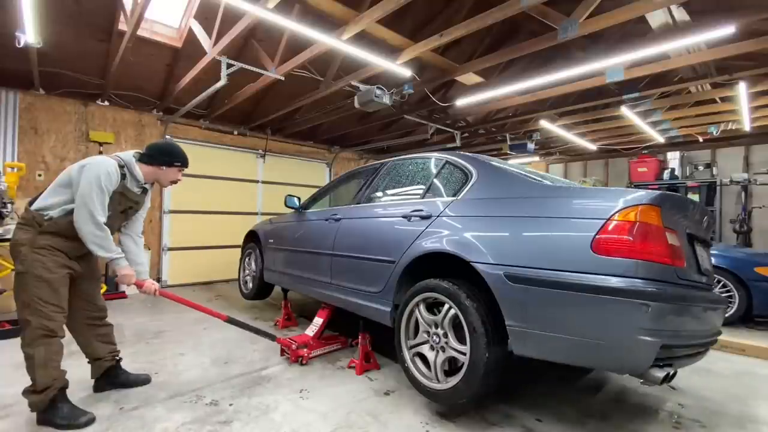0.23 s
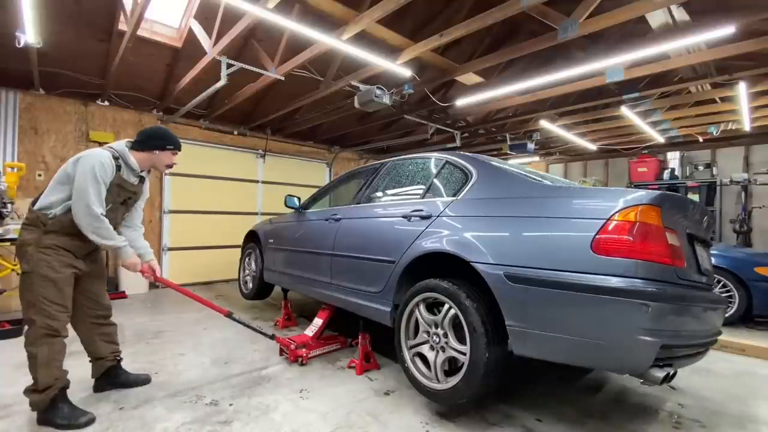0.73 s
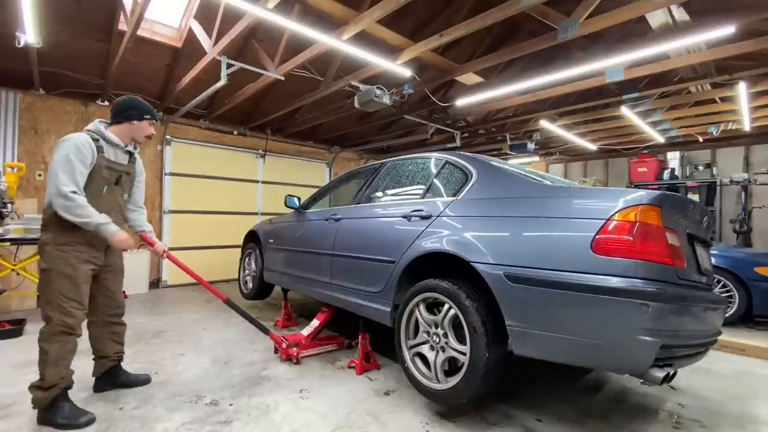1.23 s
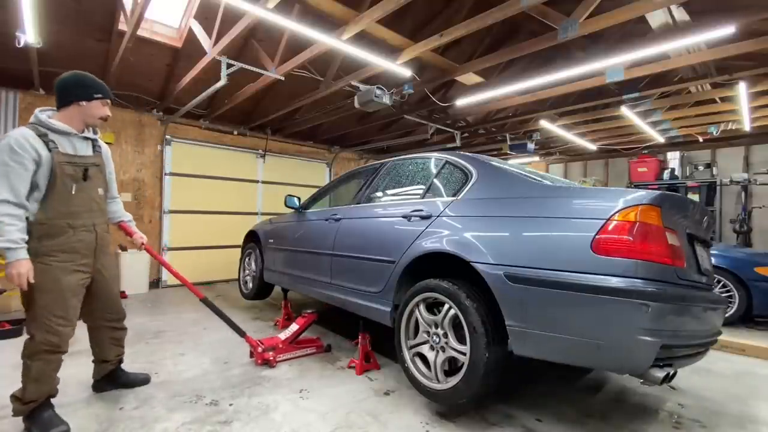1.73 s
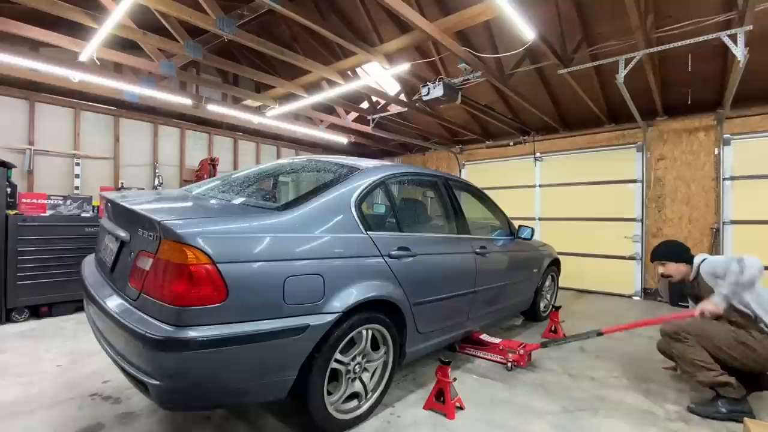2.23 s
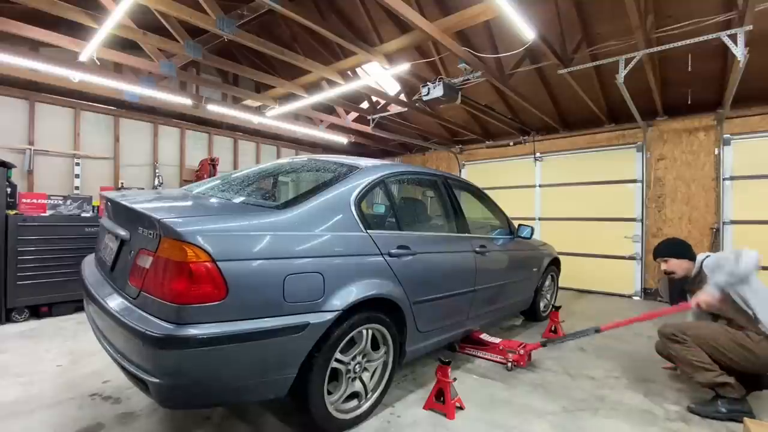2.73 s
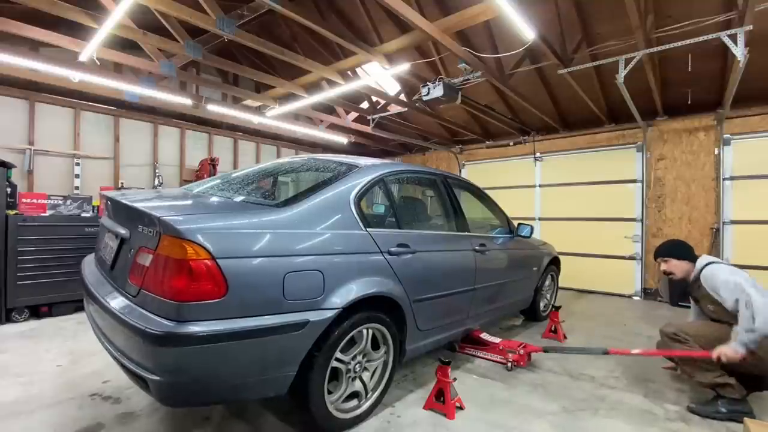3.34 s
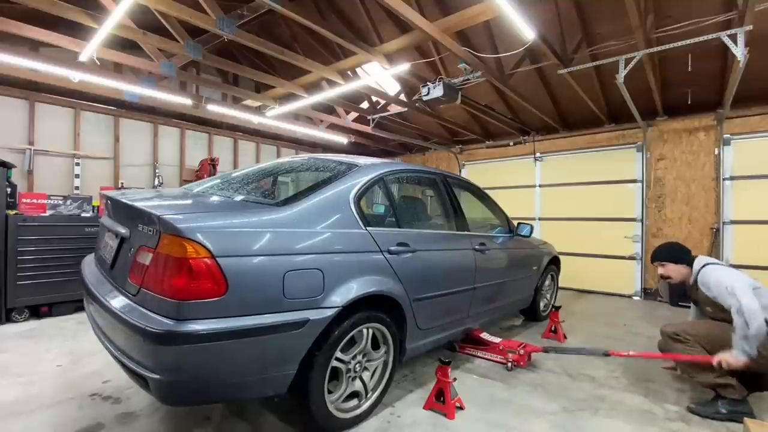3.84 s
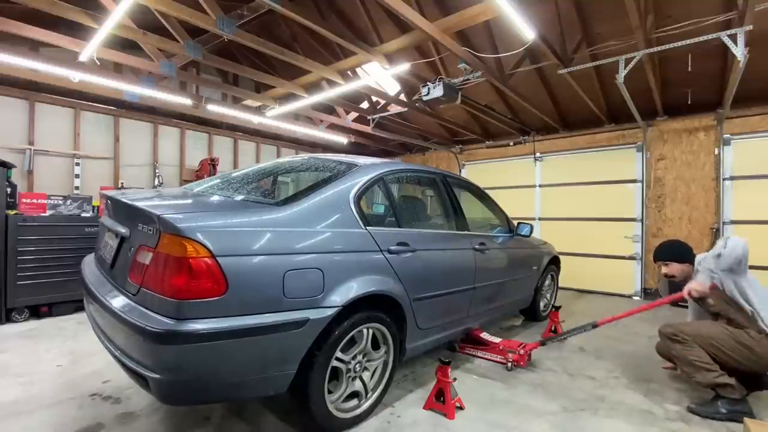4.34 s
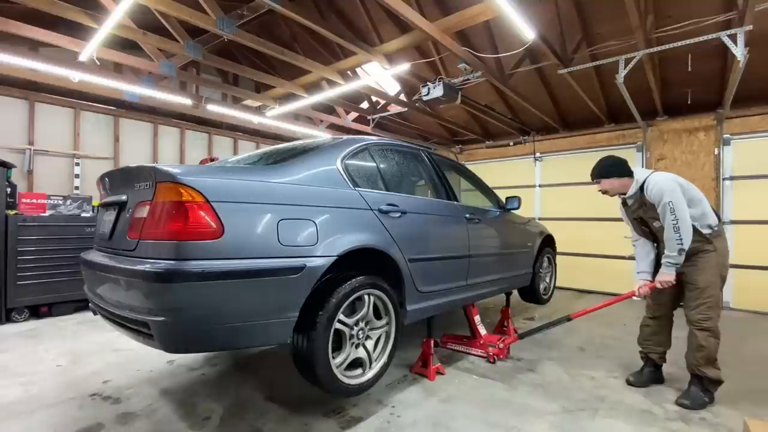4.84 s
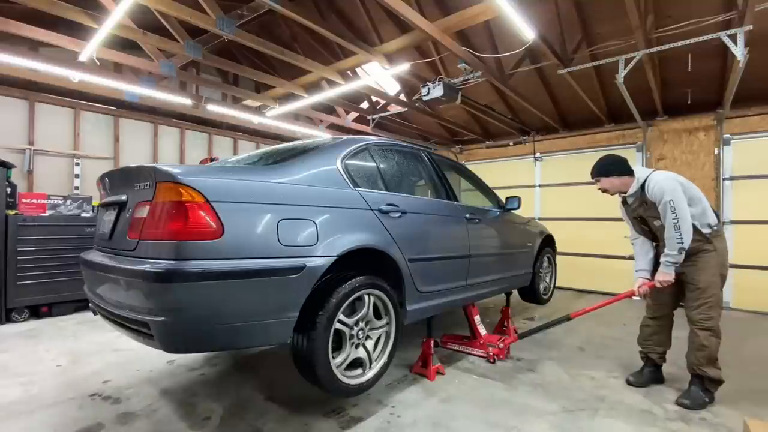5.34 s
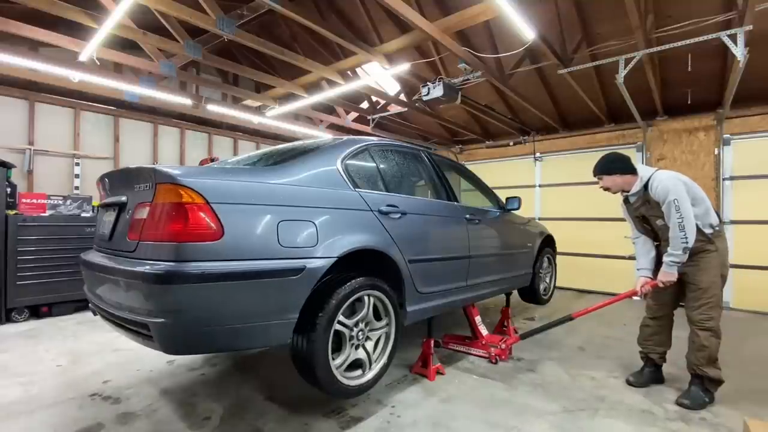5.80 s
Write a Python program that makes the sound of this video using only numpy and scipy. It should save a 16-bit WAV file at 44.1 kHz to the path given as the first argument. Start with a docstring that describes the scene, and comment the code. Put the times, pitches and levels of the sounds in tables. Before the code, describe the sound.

A floor jack rolls over concrete with a thin squeal, is pumped with metallic clacks, then a car lands on a stand with a loud clank.

```python
"""First comes a faint rustle of clothes and boots over a low hum, in a timber garage.
The steel handle of a hydraulic floor jack pings, then the jack rolls over concrete, its dry axles
squealing thinly. The handle is pumped: it clacks against its socket going up, and the piston knocks
more softly going down. After a pause the car lands on a steel stand with one loud clank
that rings through the room."""
import sys
import numpy as np
from scipy import signal
from scipy.fft import rfft, irfft, next_fast_len
from scipy.io import wavfile
from scipy.ndimage import uniform_filter1d, map_coordinates

SR = 44100
rng = np.random.default_rng(int(sys.argv[2]) if len(sys.argv) > 2 else 0)


def to_wav(sig):
    """Store sig (one row per channel, or 1-D mono) as 16-bit WAV at the path in sys.argv[1].

    Samples outside -1..1 are clipped; the rate is SR.
    """
    pcm = np.clip(np.atleast_2d(sig), -1, 1) * 32767
    pcm = np.round(pcm).astype(np.int16)
    wavfile.write(sys.argv[1], SR, pcm.T)  # frames by channels


N = 267461

# A fade time (t60) is how long a sound takes to drop by 60 dB. # A colour lists how strong a noise is from low
# to high; a ring lists the notes of a struck object. # background levels, each holding from its start until the
# next row: (start [s], shuffle level [dB], cloth level [dB], hiss level [dB], hum change [dB])
BACKGROUND_STEPS = [(0, -65, -69.5, -74.5, -0.5), (1.0, -65.5, -68.5, -70, 0.5), (2.25, -68, -73.5, -72.5, -7),
                    (4.76, -72.5, -74, -78.5, -11), (5.3, -70, -73.5, -73, -7.5)]
# leaning on the handle, then lifting it again: (time [s], push level [dB], slide level [dB])
PUSHES = [(2.56, -59.5, -69), (3.27, -58.5, -75.5), (4.03, -57.5, -71.5)]
# colours of shuffling boots, rustling cloth and its hiss: (frequency [Hz], level [dB])
SHUFFLE_COLOUR = [(13, -43), (22, 1.5), (49, 0.5), (134, -2.5), (172, -1), (236, -4), (273, -1),
                  (547, -6.5), (588, -15.5), (700, -7), (910, -44), (1540, -120)]
CLOTH_COLOUR = [(250, -29), (550, 6), (1300, -1), (2500, -9), (4000, -40.5)]
HISS_COLOUR = [(1500, -7.5), (3000, 2.5), (4500, -1.5), (6800, 0.5), (8800, -11.5), (15000, -16.5)]
# tones of the garage's hum: (pitch [Hz], level [dB])
HUM_TONES = [(63, -74.5), (102.3, -71), (166.9, -73), (291, -76.5), (334, -77.5), (398, -77)]
# the loaded jack's faint tone: (time [s], length [s], level [dB])
GROANS = [(0, 0.3, -66), (.48, 0.11, -68)]
# squeaks and scrapes of loaded steel: (time [s], level [dB], pitch [Hz], width [Hz], fade time [s])
SQUEAKS = [(0.0, -64, 6750, 250, 0.18), (1.03, -78, 5900, 130, .9), (1.235, -59, 5550, 220, 0.14),
           (2.944, -43.5, 1150, 1000, 0.085), (3.688, -41.5, 1240, 700, 0.072),
           (4.407, -45, 1250, 800, 0.089), (4.96, -64, 1700, 700, .14), (5.02, -63, 2580, 550, 0.42)]
# grit snapping underfoot: (time [s], level [dB])
GRIT_SNAPS = [(0.323, -56), (2.607, -56.5), (2.7764, -51), (3.2311, -47), (3.523, -52)]
# colour of a sharp snap, of grit or of steel: (frequency [Hz], level [dB])
SNAP_COLOUR = [(1200, -8), (3000, 4.5), (4500, 0.5), (7000, -5), (10000, -23), (15000, -17)]
# thuds of the loose handle and of boots: (time [s], level [dB], pitch [Hz])
THUDS = [(.52, -53, 130), (2.645, -53.5, 260), (2.78, -54, 110), (2.958, -44, 302), (3.169, -50.5, 294),
         (3.235, -52.5, 130), (3.713, -50, 293), (3.975, -59, 119), (4.425, -46.5, 308), (4.69, -59, 300),
         (4.767, -60, 110), (5.461, -55.5, 149), (5.558, -50.5, 294), (5.595, -49.5, 140)]

# the handle shifting in its socket: (time [s], level [dB])
PINGS = [(0.6887, -43)]
# colour of the tick that starts a ping: (frequency [Hz], level [dB])
TICK_COLOUR = [(150, -22), (520, 5), (800, 1), (1900, 5), (2500, -2), (4400, -4.5), (5500, -15),
               (9000, -28), (15000, -47)]
# ring of the handle's tube: (pitch [Hz], level [dB], fade time [s])
TUBE_RING = [(520, -7.5, .45), (1100, -25, .4), (1830, -4, 0.28), (2940, -24, .26), (3140, 1, 0.32),
             (3330, -12, .35), (4430, -18, .3), (6340, -6, 0.17)]
# how long the garage echoes: (frequency [Hz], fade time [s])
ECHO_TIMES = [(60, 0.56), (150, 0.54), (500, 0.56), (1000, 0.65), (2700, 0.63), (5400, 0.63), (7700, 0.45),
              (11000, 0.32), (15000, 0.19)]

# colour of steel wheels on concrete: (frequency [Hz], level [dB])
WHEEL_COLOUR = [(35, -39), (70, -15), (200, -3.5), (480, 0.5), (1320, 2), (1500, -4.5), (1900, -9.5),
                (2500, -10), (4600, -21), (5600, -21.5), (6350, -12.5), (9500, -40.5), (13500, -39),
                (15500, -34)]
# pitches that the jack's frame makes louder: (pitch [Hz], width [Hz], boost [dB])
FRAME_BOOSTS = [(244, 8.4, 12.5), (393, 14, 7.5), (491, 38, 6.5), (620, 14, 5), (762, 14, 5.5),
                (860, 28, 5), (1858, 62, 10.5), (2300, 27, 3), (3160, 70, 7), (3300, 110, 5.5),
                (4060, 64, 7), (4330, 38, 10), (5060, 57, 7)]
# low and high axle squeal: (pitch [Hz], width [Hz], level at full speed [dB], power of speed [no unit])
SQUEAL_TONES = [(6200, 170, -64.5, 1.25), (13050, 100, -73, 1.7)]
# a dry axle catching, so that the squeal flares: (time [s], half length [s], boost [dB])
AXLE_CATCHES = [(1.53, .04, 12), (1.685, 0.039, 15.5), (1.98, 0.031, 17.5), (2.23, .02, 5)]
# colour of the thin hiss around the squeal: (frequency [Hz], level [dB])
THIN_HISS_COLOUR = [(9000, -30), (12000, -9), (13500, 0), (15500, -3)]
# wheels hitting pits in the floor: (time [s], level [dB], pitch [Hz])
JOLTS = [(1.424, -38, 1550), (1.444, -44, 1790), (1.742, -43.5, 1990), (1.857, -32.5, 2760),
         (1.966, -36.5, 1867), (2.143, -37.5, 1520), (2.16, -38.5, 1700)]

# the handle meeting its socket (clacks) and the piston ending a stroke (knocks):
# (time [s], level [dB], treble tilt [dB per octave], echo change [dB])
CLACKS = [(2.249, -42, -4, 13), (2.9735, -22, 2.5, -5), (3.725, -21, 2.5, -4.5), (4.4445, -21, 5, -4.5)]
KNOCKS = [(2.4799, -27.5, 2, -3), (2.626, -46.5, -2, -7), (2.682, -42, 8.5, -11), (3.0935, -40.5, 8, -10),
          (3.317, -45.5, -8, -7), (3.345, -43.5, 3, -16), (3.363, -43, 7.5, -4), (4.044, -47.5, -8.5, -4),
          (4.073, -44, 0, -3), (4.091, -44.5, 11.5, -3)]
# rings of the socket and the piston: (pitch [Hz], level [dB], fade time [s])
SOCKET_RING = [(345, -23, 0.0067), (720, -36.5, 0.0083), (1030, -10, 0.015), (1396, 5.5, 0.011),
               (1786, -7.5, 0.017), (2570, -9.5, 0.021), (2950, -41, .012), (5400, -22, 0.014),
               (6330, -30.5, 0.024)]
PISTON_RING = [(374, -20.5, 0.018), (616, -14.5, 0.036), (765, -29, 0.0076), (970, -4, 0.02),
               (1207, -0.5, 0.028), (1414, -4.5, 0.0093), (2560, -39, .02), (2910, -17.5, 0.015),
               (4500, -28.5, .012)]
# quick contacts within one clack or knock: (delay [s], level [dB])
CLACK_CHATTER = [(0, -12), (.0015, -1.5), (.0044, -1)]
KNOCK_CHATTER = [(0, -5), (.0021, 2), (.0058, -11)]
# colours of their echoes: (frequency [Hz], level [dB])
CLACK_ECHO = [(90, -3), (210, -12), (325, 9), (460, -8), (700, 1.5), (1400, 2), (1600, -3), (2000, 5),
              (2330, -5.5), (2580, 4), (2850, -2), (3500, -18.5), (6500, -23), (9000, -48), (15000, -38)]
KNOCK_ECHO = [(100, -3), (200, -21), (275, -3), (430, -9.5), (800, 2), (1500, 2), (2050, -14), (2700, -2),
              (3600, -21), (7000, -26), (10000, -35)]

# the car landing on the stand: (time [s], level [dB])
CLANKS = [(5.728, -7.5)]
# ring of the stand's plates: (pitch [Hz], level [dB], fade time [s])
STAND_RING = [(51.2, -11.5, 1), (67, -5, 0.47), (153.5, -9.5, 0.53), (330.5, -7, 0.7), (454, 0, 0.38),
              (520, -2, 0.35), (567.4, -3, 0.42), (609, -11, 0.29), (1020, -8, 0.45), (2206, -11.5, .8),
              (2318, -12, 0.5), (2530, -11, 0.6), (2640, -7, .55), (3053, -7.5, 0.42), (3405, -8, 0.45),
              (3460, -12.5, 0.92), (4170, -22, 0.49), (4474, -4, 0.54), (4480, 0, 0.43), (4950, -10, .55),
              (5487, -17, 0.37), (5779, 0.5, 0.24), (5800, -3, 0.43), (6600, -13, .42), (7500, -8, 0.39)]
# colours of the landing's crunch and of its echo: (frequency [Hz], level [dB])
CRUNCH_COLOUR = [(30, -7), (65, 5), (130, -17), (390, -7.5), (520, 15), (700, 4), (1050, 3.5), (1700, -15),
                 (2600, 0.5), (4600, 1), (6600, -1.5), (8800, -25), (12000, -27), (15000, -20)]
CLANK_ECHO = [(30, -5), (60, 6.5), (120, -6), (240, 3.5), (400, 0.5), (520, 6.5), (700, -3), (1080, -0.5),
              (1700, -13.5), (2500, -0.5), (4000, -7.5), (5900, -5.5), (7700, -13.5), (8800, -27.5),
              (15000, -20.5)]

CREEP_S, PULL_S, STOP_S = 0.94, 1.425, 2.235  # the jack creeps, is pulled up to speed, and stops
TOP_HZ = 15800


def amp(db):
    """Turn decibels into a number to multiply by."""
    return 10 ** (np.asarray(db) / 20)


def unit(x):
    """Scale a signal to an average strength (rms) of 1."""
    return x / np.sqrt(np.mean(x ** 2) + 1e-20)


def along(points, hz):
    """Read between (frequency, value) points, spaced by octaves."""
    freqs, values = np.transpose(points)
    return np.interp(np.log(hz + 1), np.log(freqs + 1), values)


def gains(rows, blend_s=0.11):
    """One loudness curve for each dB column; each row holds, then blends into the next."""
    starts, *columns = np.transpose(rows)
    row = np.clip(np.searchsorted(starts, np.arange(N) / SR, side="right") - 1, 0, None)
    return [amp(uniform_filter1d(db[row], int(blend_s * SR))) for db in columns]


def wobble(rate):
    """A smooth curve through `rate` random points a second."""
    points = rng.standard_normal(int(N * rate / SR) + 4)
    return map_coordinates(points, [np.arange(N) * rate / SR])


def filtered(x, response):
    """Turn each frequency in x up or down by response(hz)."""
    size = next_fast_len(len(x) + SR // 4)
    hz = np.fft.rfftfreq(size, 1 / SR)
    return irfft(rfft(x, size) * response(hz), size)[:len(x)]


def noise(colour, size=N):
    """Noise of the given colour, at strength 1."""
    return unit(filtered(rng.standard_normal(size), lambda hz: amp(along(colour, hz))))


def whine(centre_hz, width):
    """Noise gathered around one pitch: the smaller the width, the more like a tone."""
    return unit(filtered(rng.standard_normal(N), lambda hz: 1 / (1 + (2 * (hz - centre_hz) / width) ** 2)))


def swell(s, rise, hold, t60):
    """A loudness curve that starts at time s, rises, holds and dies away."""
    t = np.arange(N) / SR - s
    return np.clip(t / rise, 0, 1) * amp(-60 * np.maximum(t - rise - hold, 0) / t60)


def fade(t60, rise):
    """The one-second loudness curve of a hit: a quick rise, then a fall."""
    t = np.arange(SR) / SR
    return amp(-60 * t / t60) * (1 - np.exp(-(t / rise) ** 2))


def ring(notes, drift):
    """Struck metal: fading notes, each wavering by about `drift` radians."""
    t = np.arange(SR) / SR
    return sum(amp(db - 60 * t / t60) * np.sin(2 * np.pi * hz * t + drift * wobble(24.3)[:SR])
               for hz, db, t60 in notes)


def rustling():
    """Boots shuffle and clothes rustle more with each push; the handle hisses as it slides back."""
    shuffle, cloth, hiss, _ = gains(BACKGROUND_STEPS)
    push = sum(amp(db) * swell(s, rise=0.021, hold=0.057, t60=1) for s, db, _ in PUSHES)
    slide = sum(amp(db) * swell(s + 0.15, rise=0.09, hold=0.092, t60=1) for s, _, db in PUSHES)
    restless = amp(0.63 * wobble(8))
    boots = np.hypot(shuffle, push) * noise(SHUFFLE_COLOUR) * unit(amp(2.1 * wobble(30)))
    clothes = np.hypot(cloth, amp(-12) * push + amp(1.5) * slide) * noise(CLOTH_COLOUR)
    hissing = np.hypot(hiss, slide) * noise(HISS_COLOUR)
    return boots + restless * (clothes + hissing)


def microphone_hiss():
    """A steady, faint hiss under everything."""
    return amp(-76.5) * rng.standard_normal(N)


def hum():
    """A faint, slightly unsteady hum in the garage."""
    t = np.arange(N) / SR
    tones = sum(np.sqrt(2) * amp(db) * np.sin(2 * np.pi * hz * t + 0.5 * wobble(7))
                for hz, db in HUM_TONES)
    return gains(BACKGROUND_STEPS)[-1] * tones


def groans():
    """The loaded jack gives off a faint, fuzzy tone."""
    loudness = sum(amp(db) * swell(s, rise=0.02, hold=length, t60=0.25) for s, length, db in GROANS)
    return loudness * whine(centre_hz=731, width=55)


def squeaks():
    """Steel under load squeaks and scrapes briefly."""
    out = np.zeros(N)
    for s, db, hz, width, t60 in SQUEAKS:
        add(out, s, amp(db) * fade(t60, rise=0.0075) * whine(hz, width)[:SR])
    return out


def grit():
    """Grains snap underfoot, each a tiny burst of bright noise."""
    out = np.zeros(N)
    for s, db in GRIT_SNAPS:
        add(out, s, amp(db + 2) * fade(t60=0.014, rise=0.00053) * noise(SNAP_COLOUR, size=SR))
    return out


def thuds():
    """The handle takes up its slack and boots shift, each with a dull thud."""
    out = np.zeros(N)
    for s, db, hz in THUDS:
        add(out, s, amp(db) * fade(t60=0.12, rise=0.0026) * whine(hz, width=0.92 * hz)[:SR])
    return out


def ping():
    """The handle's tube ticks, rings while it slips in the socket, and one note sings on."""
    out = np.zeros(N)
    t = np.arange(N) / SR
    sing_hz = 3105
    for s, db in PINGS:
        tick = amp(4) * fade(t60=0.016, rise=0.00027) * noise(TICK_COLOUR, size=SR)
        slip = 0.5 + 0.5 / (1 + (t[:SR] / 0.04) ** 6)  # the ring drops when the slip ends
        tube = amp(-2.5) * ring(TUBE_RING, drift=0.54)
        echo = amp(-4.5) * garage_echo(TICK_COLOUR, rise=0.0046)
        add(out, s, amp(db) * (tick + slip * fade(t60=17, rise=0.0013) * (tube + echo)))
        note = np.sin(2 * np.pi * sing_hz * t + 0.5 * wobble(38.8))
        flicker = amp(2 * wobble(46.5))
        out += amp(db - 14.5) * swell(s + 0.055, rise=0.098, hold=0, t60=0.34) * note * flicker
    return out


def garage_echo(colour, rise):
    """The room answers a hit: its many weak notes ripple the colour, and each dies at its own speed."""
    ripple_hz = np.arange(0, SR / 2, 45)
    ripple_db = 3 * rng.standard_normal(len(ripple_hz))
    wash = filtered(noise(colour, size=SR),  # the ripple is gentler below 1000 Hz
                    lambda hz: amp(np.interp(hz, ripple_hz, ripple_db) * np.clip(hz / 1000, 0, 1)))
    hz, t, bands = signal.stft(unit(wash), SR, nperseg=512)
    dying = amp(-60 * t / along(ECHO_TIMES, hz)[:, None])
    tail = signal.istft(bands * dying, SR, nperseg=512)[1][:SR]
    build_up = 1 - np.exp(-(np.arange(SR) / SR / rise) ** 2)
    return tail * build_up


def travel():
    """Two curves from 0 to 1: whether the jack is moving, and how fast."""
    moving = swell(CREEP_S, rise=0.05, hold=STOP_S - CREEP_S - 0.04, t60=0.09)
    pace = np.interp(np.arange(N) / SR, [PULL_S, PULL_S + 0.48], [0.21, 1])
    return moving, moving * pace


def rolling(speed):
    """Steel wheels grind over concrete and crush sand, louder as they go faster."""
    grains = rng.standard_normal(N) * (rng.random(N) < 1500 / SR)  # about 1500 grains a second
    sand = unit(filtered(grains, lambda hz: amp(along(WHEEL_COLOUR, hz))))
    grind = jack_frame(noise(WHEEL_COLOUR) + 0.77 * sand)
    roughness = unit(amp(1.53 * wobble(70)))
    return amp(-47.5) * speed * grind * roughness


def jack_frame(x):
    """The frame boosts its own pitches in a sound passing through; the result has strength 1."""
    def response(f):
        return 1 + sum((amp(db) - 1) * 1j * f * width / (hz * hz - f * f + 1j * f * width)
                       for hz, width, db in FRAME_BOOSTS)
    return unit(filtered(x, response))


def squeal(moving, speed):
    """Dry axles squeal in a thin hiss; the squeal grows with speed and flares when an axle catches."""
    t = np.arange(N) / SR
    out = np.zeros(N)
    flare_db = sum(db * np.exp(-0.5 * ((t - s) / half) ** 2) for s, half, db in AXLE_CATCHES)
    flare_shares = [0.38, 1]  # the lower tone flares less
    for share, (hz, width, db, power) in zip(flare_shares, SQUEAL_TONES):
        tone = whine(hz, width) * unit(amp(2.1 * wobble(28.47)))
        out += amp(db + share * flare_db) * speed ** power * tone
    hiss = swell(PULL_S, rise=0.18, hold=0.23, t60=2.1) * noise(THIN_HISS_COLOUR)
    return out + amp(-68) * moving * hiss


def jolts():
    """The wheels hit pits in the floor, knocking through the frame and into the room."""
    out = np.zeros(N)
    for s, db, hz in JOLTS:
        colour = [(hz / 12, -16), (hz / 3, -3), (hz, 0), (hz * 1.5, -5), (hz * 2.4, -24), (hz * 5, -44)]
        knock = amp(-4) * fade(t60=0.06, rise=0.00052) * jack_frame(noise(colour, size=SR))
        echo = amp(-13) * garage_echo(colour, rise=0.0027)
        add(out, s, amp(db) * (knock + echo))
    return out


def pumping():
    """A clack as the handle comes up, softer knocks as it is pushed down."""
    up = steel_hits(CLACKS, SOCKET_RING, CLACK_CHATTER, CLACK_ECHO, echo_db=-13, crack_db=-20.5)
    down = steel_hits(KNOCKS, PISTON_RING, KNOCK_CHATTER, KNOCK_ECHO, echo_db=-16.5, crack_db=-39)
    return up + down


def steel_hits(hits, notes, chatter, echo_colour, echo_db, crack_db):
    """Steel meets steel and chatters for a few milliseconds; each hit has its own brightness."""
    out = np.zeros(N)
    for s, db, tilt_db, echo_change_db in hits:
        tilted = [(hz, level + tilt_db * np.log2(hz / 1400), t60) for hz, level, t60 in notes]
        steel = ring(tilted, drift=0.25) * fade(t60=9, rise=0.00047)
        for delay, contact_db in chatter:
            crack = amp(crack_db) * fade(t60=0.027, rise=0.00072) * noise(SNAP_COLOUR, size=SR)
            add(out, s + 0.001 + delay, amp(db + contact_db) * (steel + crack))
        add(out, s, amp(db + echo_db + echo_change_db) * garage_echo(echo_colour, rise=0.0021))
    return out


def clank():
    """The car lands on the stand: steel crunches, plates ring in close, throbbing pairs, the room echoes."""
    out = np.zeros(N)
    for s, db in CLANKS:
        crunch = amp(1.5) * fade(t60=0.056, rise=0.0062) * noise(CRUNCH_COLOUR, size=SR)
        plates = amp(-22.5) * fade(t60=9, rise=0.0035) * ring(STAND_RING, drift=0.45)
        echo = amp(-16.5) * garage_echo(CLANK_ECHO, rise=0.012)
        add(out, s, amp(db) * (crunch + plates + echo))
    return out


def add(out, s, sound):
    """Mix a sound into out at time s."""
    part = out[max(round(s * SR), 0):][:len(sound)]
    part += sound[:len(part)]


def scene():
    """All the sounds together, in one channel."""
    moving, speed = travel()
    steel = pumping() + clank() + ping()
    wheels = rolling(speed) + squeal(moving, speed) + jolts()
    small_sounds = groans() + squeaks() + thuds() + grit()
    background = rustling() + microphone_hiss() + hum()
    return (steel + wheels + small_sounds + background)[None]


def record(dry):
    """Cut away the highest treble, above TOP_HZ."""
    return np.array([filtered(x, lambda hz: hz < TOP_HZ) for x in dry])


dry = scene()
out = record(dry)
to_wav(out)
```